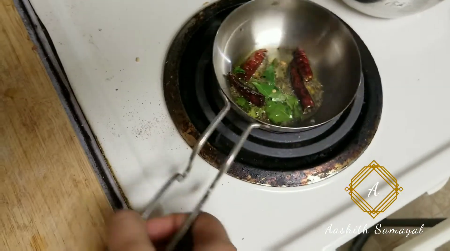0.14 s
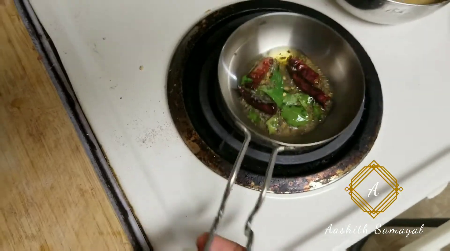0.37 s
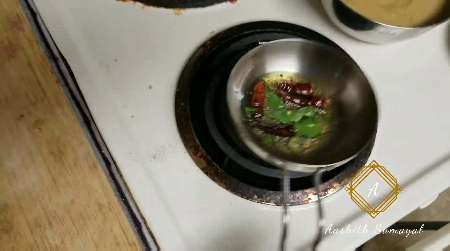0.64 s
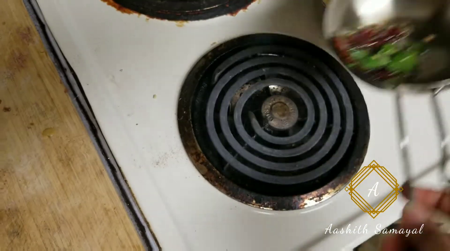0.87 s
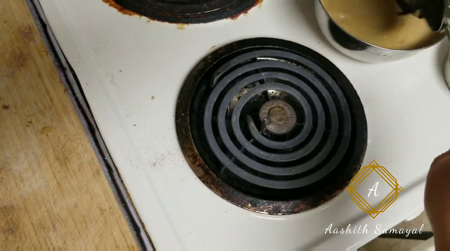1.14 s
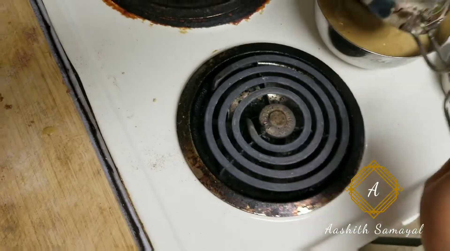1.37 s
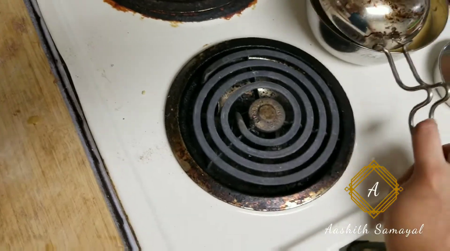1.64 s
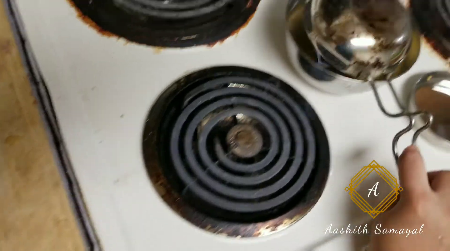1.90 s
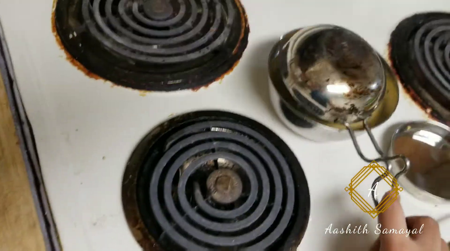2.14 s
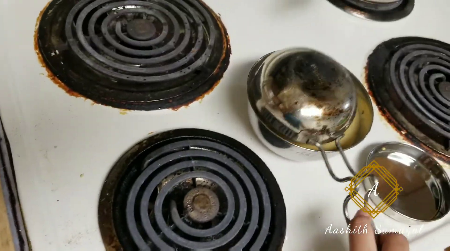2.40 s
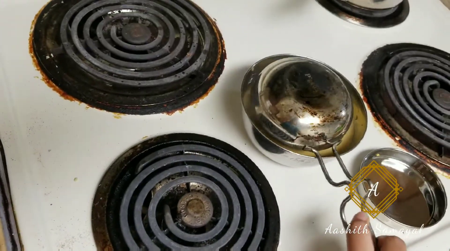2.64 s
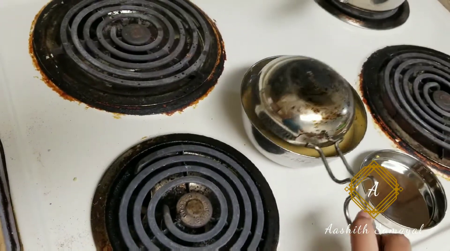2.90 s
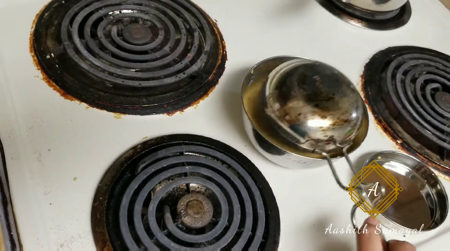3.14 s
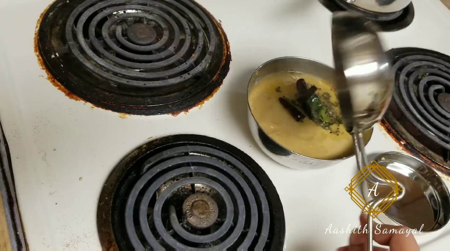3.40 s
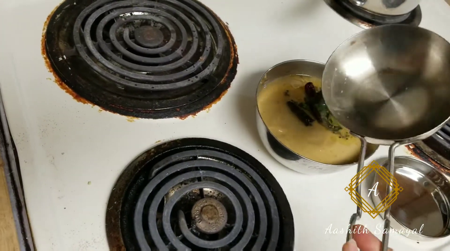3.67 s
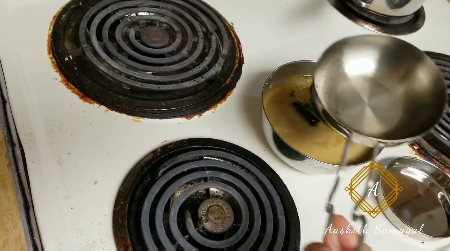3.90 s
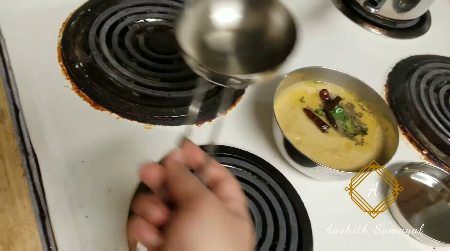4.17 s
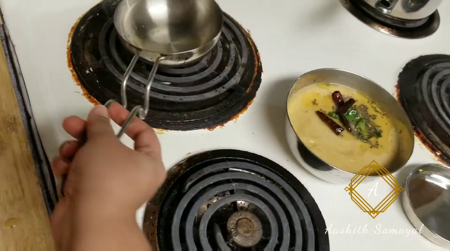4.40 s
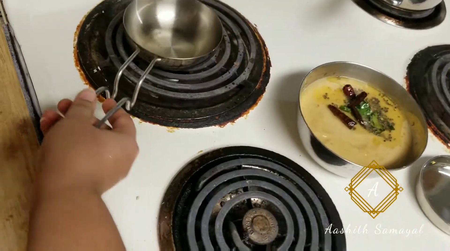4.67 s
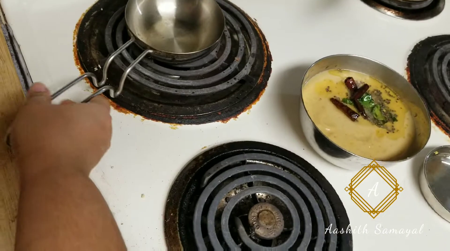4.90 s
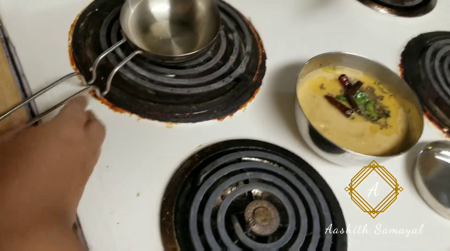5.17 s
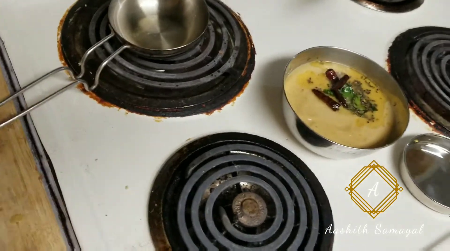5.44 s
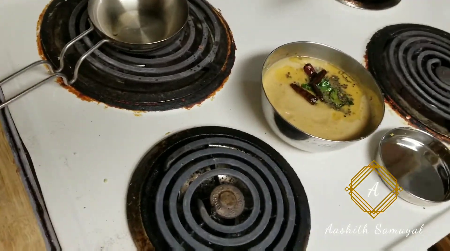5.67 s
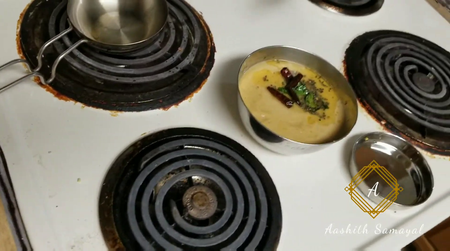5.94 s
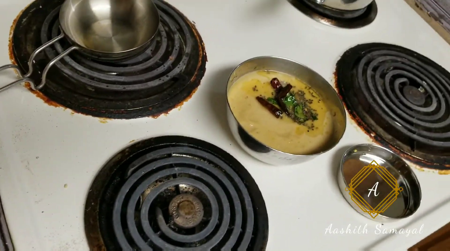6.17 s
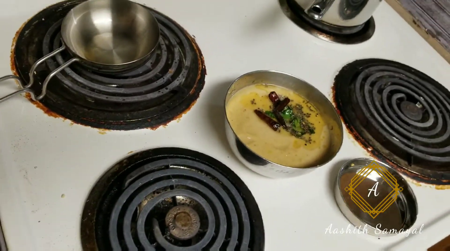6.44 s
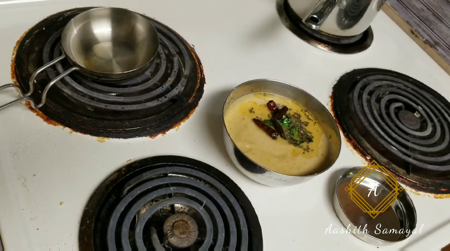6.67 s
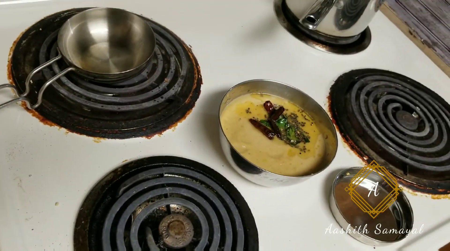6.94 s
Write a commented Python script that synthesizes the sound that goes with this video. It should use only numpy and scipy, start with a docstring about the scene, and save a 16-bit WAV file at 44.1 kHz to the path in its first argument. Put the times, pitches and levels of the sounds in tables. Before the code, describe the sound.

Seeds pop and a pan scrapes off a stove coil, then oil sizzles and gurgles in sauce amid sharp metal knocks, fading to sparse crackles.

```python
"""First a faint simmer is heard over a kitchen fan motor, then seeds popping and a steel pan jerking off a stove coil.
Its oil and spices are tipped into a bowl of wet sauce, which sizzles: random bursts become fizz, bubbles and gurgle.
The upturned pan is knocked empty on the bowl rim, then set down on another coil: contact noise and paired ringing modes.
Pops are snaps with a short pitched body; the fan is wavering sines over shaped noise.
One microphone channel holds the close sources, the room's reflections and the fan."""
import sys
import numpy as np
from scipy import signal
from scipy.fft import rfft, irfft
from scipy.io import wavfile

SR = 44100
rng = np.random.default_rng(int(sys.argv[2]) if len(sys.argv) > 2 else 0)


def transcribe(signal):
    """Save signal, clipped to [-1, 1], as a 16-bit WAV file at the path in sys.argv[1]."""
    frames = np.atleast_2d(signal).T
    limited = np.clip(frames, -1, 1)
    pcm = np.round(limited * 32767).astype(np.int16)
    wavfile.write(sys.argv[1], SR, pcm)


def elevation(decibels):
    """Turn decibel levels (scalar or array-like) into linear amplitude ratios."""
    levels = np.asarray(decibels, float)
    return 10 ** (levels / 20)


N = 311346   # samples, about 7 s


def rms_one(x):
    """Scale to rms 1."""
    return x / np.sqrt(np.mean(x ** 2) + 1e-20)


def in_time(rows):
    """Columns joined by lines in time; silent before the first row, held after the last."""
    s, *columns = np.transpose(rows)
    return [np.interp(np.arange(N) / SR, s, c, left=-150, right=c[-1]) for c in columns]


def at_hz(points, hz, axis=1):
    """A column read on a log-frequency axis."""
    return np.interp(np.log(hz), np.log(np.array(points)[:, 0]), np.array(points)[:, axis])


def colour(x, spectrum):
    """Shape by a spectrum in dB per Hz."""
    hz = np.maximum(np.arange(N // 2 + 1) * SR / N, 1)
    return irfft(rfft(x) * elevation(at_hz(spectrum, hz)), N)


def above(x, hz):
    """Steep low cut."""
    return signal.sosfilt(signal.butter(4, hz, "high", fs=SR, output="sos"), x)


def below(x, hz, order):
    """High cut."""
    return signal.sosfilt(signal.butter(order, hz, fs=SR, output="sos"), x)


def between(x, low_hz, high_hz):
    """Band of a sound."""
    return signal.sosfilt(signal.butter(2, [low_hz, high_hz], "band", fs=SR, output="sos"), x)


def drift(rate_hz):
    """Slow random wander, spread 1, made at one sample in 40 and joined by lines."""
    r = np.exp(-80 * np.pi * rate_hz / SR)
    noise = rng.standard_normal(N // 40 + 2002)
    slow = signal.lfilter([1], [1, -2 * r, r * r], noise)[2000:]
    return np.interp(np.arange(N) / 40, np.arange(len(slow)), rms_one(slow))


def ring(clicks, hz, t60):
    """A unit click sets a sine of height 1 ringing."""
    r, w = elevation(-60 / (t60 * SR)), 2 * np.pi * hz / SR
    return signal.lfilter([0, np.sin(w)], [1, -2 * r * np.cos(w), r * r], clicks + 1e-18)


def bursts(per_s, spread_db, clump_db):
    """Random clicks in clumps, a few much larger than the rest; even loudness as the rate changes."""
    chance = per_s * elevation(clump_db * drift(14.0)) / SR
    sizes = elevation(spread_db * np.minimum(rng.exponential(1, N), 3.5)) * rng.choice([-1, 1], N)
    return sizes * (rng.random(N) < chance) / np.sqrt(per_s)


def grains(clicks, low_hz, high_hz, cycles, count):
    """Each click rings, dying by 60 dB in some cycles, at one of several pitches dealt at random."""
    dealt = rng.integers(0, count, N)
    pitches = np.geomspace(low_hz, min(high_hz, .45 * SR), count)
    return rms_one(sum(ring(clicks * (dealt == k), hz, cycles / hz) * hz for k, hz in enumerate(pitches)))


def add(out, s, sound):
    """Mix a sound in at a time."""
    i = round(s * SR)
    out[i:i + len(sound)] += sound[:N - i]


# At the bowl, hot oil on the sauce: t/s, fizz level/dB, bubble level/dB
OIL_ON_SAUCE = [(1.18, -78, -73), (1.25, -45, -53), (1.35, -38.5, -40), (1.42, -37.5, -47),
                (1.55, -31.5, -43), (1.72, -39, -42.5), (1.8, -29, -42), (1.97, -30.5, -49),
                (2.26, -39, -63), (2.76, -35, -49.5), (3.22, -33.5, -36), (3.4, -32.5, -42),
                (3.52, -32, -40), (3.91, -34.5, -37), (4.34, -35.5, -43), (4.6, -32.5, -44),
                (4.82, -36, -44.5), (5.0, -39, -42.5), (5.52, -40.5, -48.5), (5.7, -43, -46.5),
                (5.9, -42, -51.5), (6.1, -42.5, -51.5), (6.47, -44, -52), (7.06, -45.5, -54.5)]
# Spectrum of the fizz: f/Hz, level/dB per Hz
FIZZ_COLOUR = [(760, -107), (1300, -1), (1370, 1), (1500, -16), (2010, -2), (3020, -7), (3250, -19.5),
               (4270, -5), (5200, -12), (5830, -5), (7040, -6.5), (7970, -3), (9520, -9), (12500, 1),
               (15700, -4)]


def sizzle():
    """Steam bursting through oil: fizz and crackle, bubbles that the bowl favours, a low gurgle, thin squeaks."""
    fizz_db, bubbles_db = in_time(OIL_ON_SAUCE)
    t = np.arange(N) / SR

    # the upturned pan covers the bowl and makes the gurgle hollow and loud
    cover_on_s, cover_off_s, cover_move_s = 1.55, 3.33, 0.18
    covered_db, open_db = -6, -19   # gurgle relative to the bubbles
    covered = np.clip(np.minimum(t - cover_on_s, cover_off_s - t) / cover_move_s + .5, 0, 1)
    gurgle_db = bubbles_db + open_db + (covered_db - open_db) * covered

    # once the oil cools the gurgle falls 10 dB within a second, and the bursts thin out
    cooling_s, halving_s = 4.2, 1.1
    gurgle_db -= 10 * np.clip(t - cooling_s, 0, 1)
    per_s = 2500 * .5 ** (np.maximum(t - cooling_s, 0) / halving_s)

    # squeaks are stronger as the oil first lands, then fade
    landing = np.exp(-np.abs(t - OIL_ON_SAUCE[0][0]) / 0.18)
    squeak_db = fizz_db - 12 + 15.5 * landing

    crackle = rms_one(bursts(.2 * per_s, spread_db=3.0, clump_db=6.0))   # broad snaps that also ring bubbles
    spits = grains(bursts(.5 * per_s, spread_db=6.5, clump_db=3.5), 2960, 21200, cycles=8.9, count=9)
    fine = grains(bursts(4.7 * per_s, spread_db=4.0, clump_db=4.0), 4550, 10970, cycles=7.0, count=9)
    hiss = rng.standard_normal(N) * elevation(2.0 * drift(8.0))   # the smallest bubbles merge
    fizz = rms_one(colour(0.31 * crackle + .6 * spits + 0.61 * fine + 0.66 * hiss, FIZZ_COLOUR))

    small = rms_one(bursts(.9 * per_s, spread_db=7.5, clump_db=4.0))
    bubbles = grains(crackle + .8 * small, 1780, 2600, cycles=10.0, count=18)
    bubbles = above(bubbles, 1300)   # small bubbles radiate no bass
    gurgle = grains(small, 473, 1230, cycles=24.0, count=8)
    squeak = grains(small[::-1], 2880, 5000, cycles=12.0, count=8)   # reversed, so it falls at other moments
    return elevation(fizz_db) * fizz + elevation(bubbles_db) * bubbles + elevation(gurgle_db) * gurgle + elevation(squeak_db) * squeak


# Dull contact on the rim, relative partials: f/Hz, level/dB
RIM_KNOCK = [(620, -6), (1350, 3), (2350, -8.5), (4600, -17)]


def contact_knock(t, noise, settling):
    """A brief dull thud of a few partials, a metal tick, and clatter in proportion to the settling."""
    spot = elevation(rng.normal(0, 0.74, len(RIM_KNOCK)))   # each blow lands on another spot
    thud = sum(-g * elevation(db) * np.sin(2 * np.pi * hz * t) for g, (hz, db) in zip(spot, RIM_KNOCK))
    thud *= np.exp(-((t - .0011) / 0.0011) ** 2)
    thud /= np.max(np.abs(thud))
    tick = 0.35 * below(noise, 5000, order=2) * np.exp(-t / 0.0025)
    clatter = 1.04 * settling * noise * np.exp(-t / 0.024)   # on the coil
    return thud + tick + clatter


# Pan modes, each a close pair: f/Hz, relative level/dB, t60/s, split at light contact/Hz, weaker partner/0-1
PAN_MODES = [(826, 4, .6, 6, .5), (1460, 20, .9, 9, .3), (2895, 0, 1.5, 14.5, .9), (3825, -18, .5, 12, .5),
             (4060, -17, .6, 10, .5), (4900, 11, .9, 12, .3), (5750, 4, .9, 15, .4), (6200, 8, .3, 20, .5),
             (7705, 19, .7, 22, .2), (7865, 13, .35, 25, .5), (10600, 15, .15, 30, .5),
             (11110, 10, .25, 30, .5)]


def pan_ring(t, high_db, low_db, settling, on_rim, free_s):
    """Steel modes split into close pairs, which beat; contact chokes them."""
    rim_damping_db_per_s = 140   # the rim hardly chokes the ring, only its low modes
    rings = 0
    for hz, db, t60, split_hz, partner in PAN_MODES:
        side_db = 0
        if hz < 2000:
            side_db = low_db - rim_damping_db_per_s * t * on_rim
        elif hz > 4500:
            side_db = high_db
        half_hz = split_hz * (1 + 1.7 * settling ** 2) / 2   # resting on something pulls the pair apart
        slip = half_hz * (t - .02 * (1 - .7 * settling))   # the two are in step just after the blow
        pair = np.sin(2 * np.pi * (hz * t + slip)) + partner * np.sin(2 * np.pi * (hz * t - slip))
        rings += pair * elevation(db + side_db - 60 * t / t60)
    rings *= (t < free_s) * (1 - np.exp(-t / 0.002))   # the next contact stops the ring
    return rings * elevation(-2500 * abs(settling) * t ** 2)   # the pan rocks, then sits and is choked


# Stove top and bowl after a blow: f/Hz, relative level/dB per Hz, t60/s
STOVE_BOOM = [(90, -9, 1), (162, 1.5, 0.7), (380, -2, 0.47), (745, -0.5, 0.59), (1220, -5.5, 0.44),
              (1940, -0.5, 0.26), (4100, -17, 0.61), (8700, -11.5, 0.15)]


def stove_boom(t, noises):
    """Stove top and bowl boom: half-octave bands of noise, each dying at its own rate."""
    edges = 70 * 2 ** np.arange(0, 7.6, .5)
    boom = 0
    for k, (low, high) in enumerate(zip(edges, edges[1:])):
        hz = np.sqrt(low * high)
        band = between(noises[k % 2], low, high)
        boom += band * elevation(at_hz(STOVE_BOOM, hz) - 60 * t / at_hz(STOVE_BOOM, hz, axis=2))
    return boom * (1 - np.exp(-t / 0.00022)) * 3.21


# Wire handle slapping back on the pan: t after the blow/s, relative level/dB
HANDLE_BOUNCES = [(0.024, -15), (0.06, -14), (.098, -20.5)]


def handle_slaps(t, noise, extra_db):
    """The loose wire handle bounces: dying noise bursts in a bright band and a lower, stronger one."""
    slaps = sum(elevation(db) * (t > lag) * np.exp(-np.abs(t - lag) / 0.0095) for lag, db in HANDLE_BOUNCES) * noise
    slaps *= elevation(extra_db)
    return between(slaps, 5200, 8800) + 4.3 * between(slaps, 1500, 2100)


# Pan knocked on the bowl rim: t/s, knock level/dB, ring level/dB, high modes/dB, low modes/dB
RIM_TAPS = [(1.627, -16, -47, -17, -22), (1.907, -3.5, -34, -40, -14), (2.096, -5, -30.5, -42, -14),
            (2.28, -4.5, -30, -45, -16.5), (2.471, -6, -34, -29, -32), (2.658, -7, -36.5, -20, -28),
            (2.869, -5.5, -33, -20.5, -30), (3.141, -6, -34, -37, -7.5)]
# Pan set down on the coil, then nudged: t/s, knock level/dB, ring level/dB, high modes/dB, low modes/dB,
# stove rumble level/dB, settling/0-1
COIL_SET_DOWNS = [(4.576, -14, -22.5, -22, -17, -27.5, 0.52), (5.037, -34, -43.5, -24, -7.5, -30.5, 0.05)]


def pan_blows():
    """Each blow: a knock, the stove booming and handle bouncing; the pan's ring is returned apart."""
    thuds, rung, t = np.zeros(N), np.zeros(N), np.arange(round(.6 * SR)) / SR
    firm_db = np.median([row[1] for row in RIM_TAPS])
    tap_stove_db, tap_settling = -23.5, 0.03   # for a firm tap; weaker taps stir the stove less
    taps = [row + (tap_stove_db + min(2.1 * (row[1] - firm_db + 0.5), 0), tap_settling) for row in RIM_TAPS]
    blows = taps + COIL_SET_DOWNS
    ends = [row[0] for row in blows[1:]] + [N / SR]
    last_tap_s = RIM_TAPS[-1][0]
    for (s, knock_db, ring_db, high_db, low_db, stove_db, settling), end in zip(blows, ends):
        noise = rng.standard_normal((3, len(t)))
        knock = contact_knock(t, noise[2], settling)
        boom = stove_boom(t, noise[:2])
        # the grip loosens after the last tap and the handle slaps harder
        rattle = handle_slaps(t, noise[2], extra_db=5 * (s == last_tap_s))
        rings = pan_ring(t, high_db, low_db, settling, on_rim=s <= last_tap_s, free_s=end - s)
        add(thuds, s, elevation(knock_db) * knock + elevation(stove_db) * (boom + 5.2 * rattle))
        add(rung, s, elevation(ring_db) * rings)
    return thuds, rung


# Pitches the bowl and the drops favour: f/Hz
FAVOURED_HZ = [2100, 2400, 6500, 8000, 12500]


def stray_pops():
    """Rows for the lesser pops, which stand out as the fizz thins: any moment, level following the fizz."""
    per_s, from_s = 20, 4.3
    over_fizz_db, range_db, snap_db, splutter_db = 14, 8, -9, -17
    when, pitch, size = rng.random((60, 3)).T
    s = from_s + np.cumsum(-np.log(1 - when) / per_s)
    fizz_db = np.interp(s, *np.transpose(OIL_ON_SAUCE)[:2])
    db = fizz_db + over_fizz_db + range_db * (size - .5)
    hz = np.array(FAVOURED_HZ)[(pitch * len(FAVOURED_HZ)).astype(int)]
    return [(a, b, c, snap_db, splutter_db) for a, b, c in zip(s, db, hz) if a < N / SR - .01]


# Single seeds and drops bursting: t/s, level/dB, f/Hz, snap and splutter relative to that level/dB
SEED_POPS = [(0.1027, -6.5, 6140, -15, -17), (0.2259, -11.5, 8300, -7, -15.5),
             (0.9522, -14, 1700, -23, -22), (0.9802, -9, 1720, -32, -22), (1.2266, -34, 4400, -6, -8),
             (1.2426, -24.5, 6340, -14, -10), (1.3359, -14, 1880, 6, -4), (1.4287, -12.5, 4900, -12, -16.5),
             (1.4459, -17.5, 7100, -6, -21), (1.6812, -16, 6500, -8, -11), (1.7125, -18, 14200, -10, -12),
             (1.8741, -18, 6540, -11, -3.5), (2.0283, -22, 7000, -12, -8), (3.5054, -13.5, 2160, -20, -14),
             (4.4443, -18, 8000, -4, -31), (4.692, -17, 2120, -10, -26), (4.7872, -13, 8040, -11, -26),
             (4.8145, -13.5, 8050, -6, -16), (4.9067, -19.5, 2130, -1, -12), (5.247, -15.5, 3870, -14, -31),
             (5.2704, -12.5, 12600, -11, -17.5), (5.5104, -19.5, 13200, -10, -12),
             (5.7518, -25.5, 2130, -14, -11), (5.8536, -18, 13200, -9, -21), (5.9005, -24, 1880, -8, -8.5),
             (5.9828, -9.5, 12500, -11, -18), (5.997, -15, 13000, -8, -23), (6.2582, -26, 2180, -4, -11),
             (6.4343, -23.5, 2140, -12, -18), (6.4597, -21.5, 6310, 0, -16), (6.552, -18, 12700, -6, -19),
             (6.5819, -27, 6530, -3, -15), (6.8598, -25, 1970, -14, -8), (6.984, -16, 13000, -8, -26),
             (7.0224, -22, 1870, 4, -21)]


def pops():
    """A sharp snap plus a few cycles at the cavity's pitch, then a splutter of droplets."""
    out, t = np.zeros(N), np.arange(2600) / SR
    rows = SEED_POPS + stray_pops()
    noise = rng.standard_normal((len(SEED_POPS) + 60, 2, len(t)))   # enough for every stray pop
    for (s, db, hz, snap_db, splutter_db), (crack, spray) in zip(rows, noise):
        snap = np.diff(np.sign(crack) * np.exp(-t / 0.00004), prepend=0)
        body = np.sin(2 * np.pi * hz * t) * np.exp(-t * hz / 1.3)
        drops = signal.lfilter([1, -1], [1, -.6], spray * np.abs(crack)) * np.exp(-t / 0.0071)
        pop = elevation(snap_db) * snap + body + elevation(splutter_db) * drops
        add(out, s + .0006, elevation(db) * pop)
    return above(out, 1390)   # seeds radiate no bass


# At the coil, pan jerking: t of the strongest catch/s, level/dB, build-up/dB per s
PAN_JERKS = [(0.149, -31.5, 3000), (0.178, -31, 400), (0.249, -35.5, 3000), (0.4, -50, 200),
             (0.517, -48, 3000)]
# Spectrum of the scrape: f/Hz, level/dB per Hz
SCRAPE_COLOUR = [(150, 11.5), (250, -16.5), (855, -19), (1490, -23), (1810, -19.5), (2070, -29),
                 (7860, -44), (9000, -39), (11700, -60), (19800, -120)]


def slide():
    """Dense uneven catches of the pan bottom on the coil."""
    t, fall_db_per_s = np.arange(N) / SR, 402
    jerks = [db - np.maximum(rise * (s - t), fall_db_per_s * (t - s)) for s, db, rise in PAN_JERKS]
    sizes = elevation(9.2 * rng.exponential(1, N).clip(0, 2.5)) * rng.choice([-1, 1], N)
    catches = sizes * (rng.random(N) < 2500 / SR)   # 2500 per s
    return elevation(np.max(jerks, axis=0)) * rms_one(above(colour(catches, SCRAPE_COLOUR), 294))


# Spectrum of the simmer in the pan: f/Hz, level/dB per Hz
FRYING_COLOUR = [(760, -29), (1300, 3), (1440, -4), (1640, -2), (2010, -7.5), (3320, -4), (5250, -8),
                 (6270, -6), (9720, -8), (12500, -5), (15700, -12)]


def simmer():
    """Oil frying faintly: a fine hiss of noise and small bursts, until the pan is tipped."""
    level_db, swell_db, tipped_s = -60.5, 1.0, 1.4
    fry = rng.standard_normal(N) + .5 * rms_one(bursts(1300.0, spread_db=2.5, clump_db=1.5))
    swell = elevation(swell_db * drift(2.0))
    in_pan = np.arange(N) / SR < tipped_s
    return elevation(level_db) * swell * in_pan * rms_one(colour(fry, FRYING_COLOUR))


# In the kitchen, fan motor lines: f/Hz, rms level before wobble/dB, wobble/dB
MOTOR_LINES = [(59.5, -61, 3.0), (120, -47.5, .4), (180, -64, 2.0), (219, -62, 2.0), (240, -52.5, .8),
               (340, -63, 2.5), (361, -62, 2.0), (480, -74, 2.0), (618, -70, 2.5)]
# Spectrum of the fan's air noise: f/Hz, level/dB per Hz
AIR_COLOUR = [(15, -49), (25, -13), (69, 1), (119, -1.5), (146, -7), (174, -31), (240, 4), (294, -8.5),
              (359, -18), (405, -13.5), (604, -14.5), (884, -16), (1190, -33.5), (2010, -32), (3000, -23),
              (3900, -65), (6600, -120)]


def fan():
    """Motor lines that waver in level and phase, over broad air noise."""
    t, air_db = np.arange(N) / SR, -55.5
    lines = np.zeros(N)
    for hz, db, wobble_db in MOTOR_LINES:
        level = np.sqrt(2) * elevation(db + wobble_db * drift(6.0))
        lines += level * np.sin(2 * np.pi * hz * t + .2 * wobble_db * drift(3.0))
    return lines + elevation(air_db) * rms_one(colour(rng.standard_normal(N), AIR_COLOUR))


def kitchen(x):
    """Reflections as dying noise, the part above the wall cut dying twice as fast."""
    t60_s, level_db, wall_cut_hz = 0.26, -9.5, 16000
    t = np.arange(round(.5 * SR)) / SR
    noise = rng.standard_normal(len(t))
    low = below(noise, wall_cut_hz, order=1)
    tail = low * elevation(-60 * t / t60_s) + (noise - low) * elevation(-120 * t / t60_s)
    tail *= t > .002   # the first reflection comes after 2 ms
    return signal.fftconvolve(x, elevation(level_db) * tail / np.sqrt(np.sum(tail ** 2)))[:N]


def scene():
    """All sources in one channel: close sources, their reflections, the fan."""
    thuds, rung = pan_blows()
    near = simmer() + sizzle() + pops() + thuds + slide()
    room = kitchen(near + .4 * rung)   # the thin ring close by stirs the room little
    return (near + rung + room + fan())[None]


def top_cut(x):
    """Nothing passes above the cut-off."""
    return signal.sosfilt(signal.butter(12, 16970, fs=SR, output="sos"), x)


def record(dry):
    """A steep elliptic filter cuts the top of the microphone channel above 15720 Hz."""
    mix = signal.sosfilt(signal.ellip(10, 1, 55, 15720, fs=SR, output="sos"), dry)
    return top_cut(mix)


dry = scene()
out = record(dry)
transcribe(out)
```